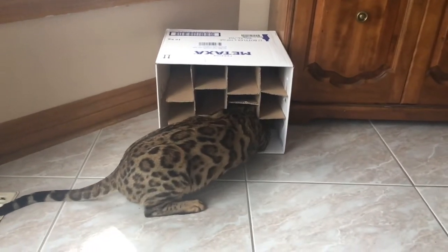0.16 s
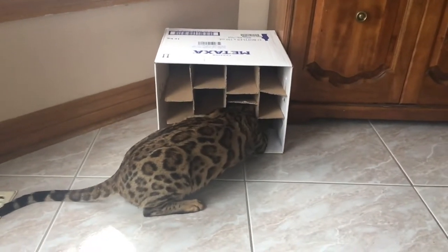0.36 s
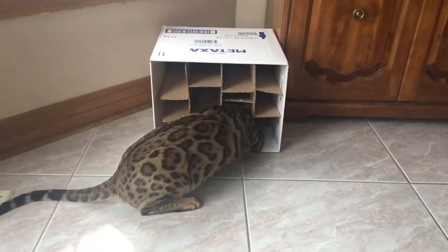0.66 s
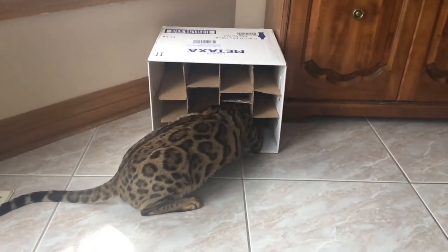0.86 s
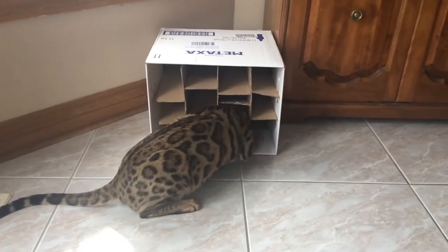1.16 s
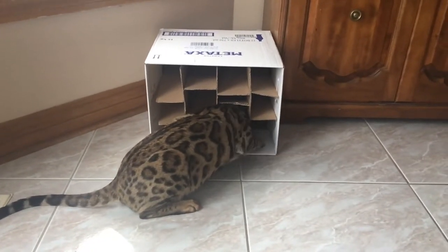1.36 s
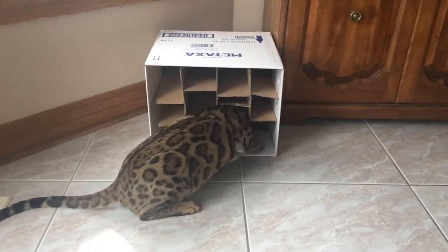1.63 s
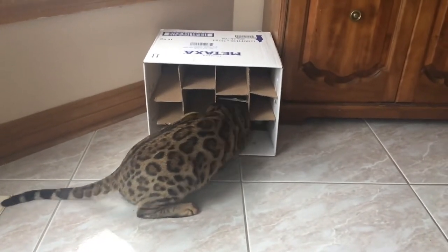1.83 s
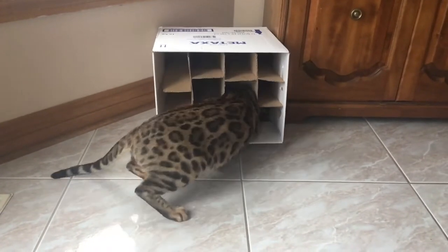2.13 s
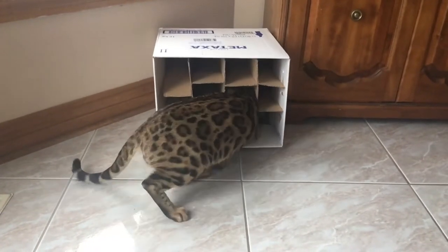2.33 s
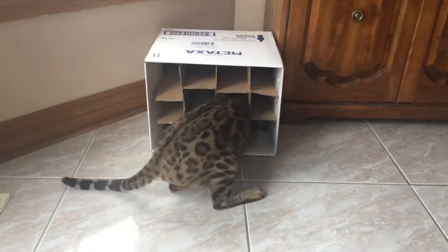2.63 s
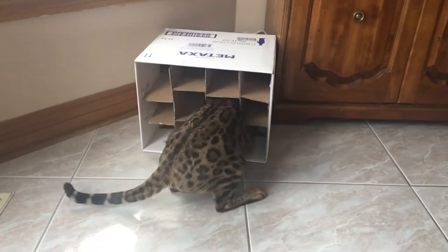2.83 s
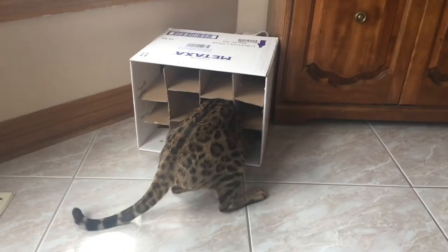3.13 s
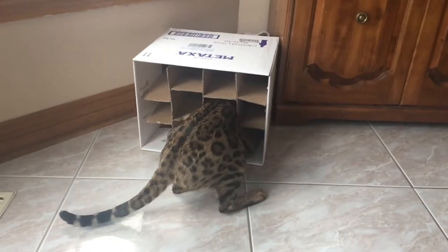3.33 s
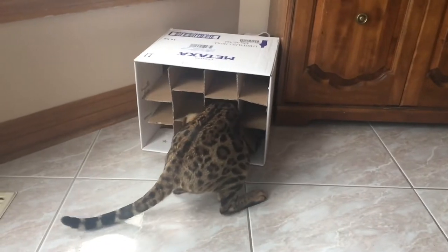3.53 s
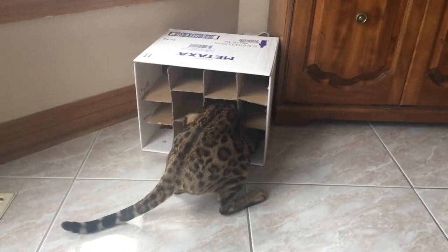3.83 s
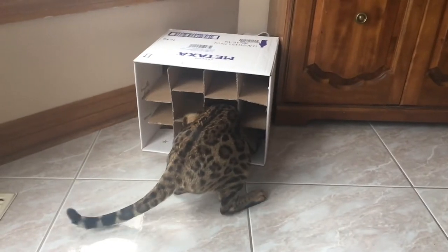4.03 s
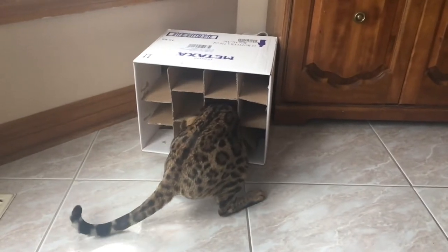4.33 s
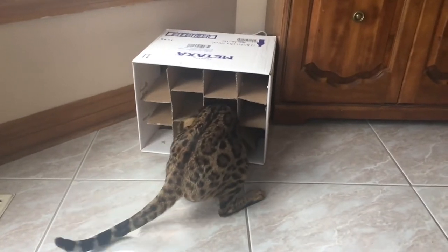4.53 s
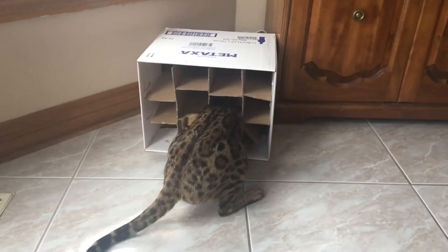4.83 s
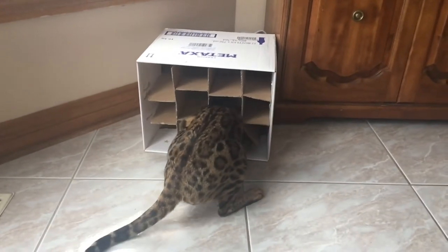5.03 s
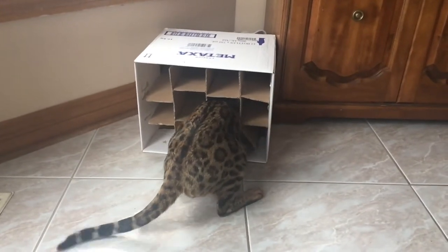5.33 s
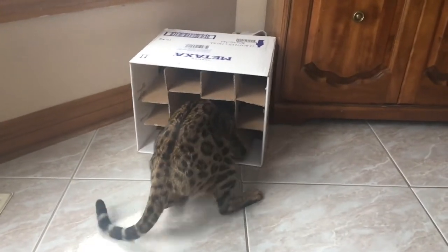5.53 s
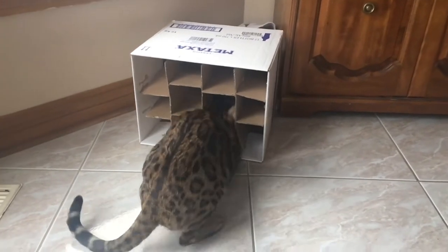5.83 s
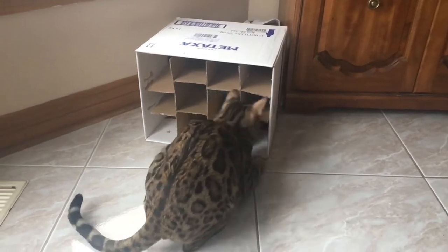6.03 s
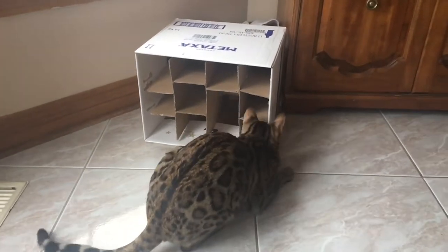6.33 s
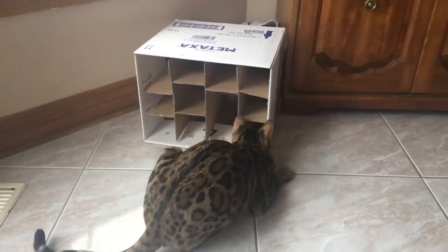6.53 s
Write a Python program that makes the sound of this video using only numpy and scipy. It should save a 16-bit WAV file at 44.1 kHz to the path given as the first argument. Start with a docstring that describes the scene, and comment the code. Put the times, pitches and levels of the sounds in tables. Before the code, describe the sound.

Cardboard rustles, scrapes and knocks as a cat pushes into a box, one heavy hollow thump midway, then scattered flicks and fading rubs.

```python
"""A cat pushes its head and paws into a cardboard carton with dividers, on the tiles of a quiet room.
Over a low steady background and a faint hiss, small flicks, thumps and rubs come first. After two seconds
it gets busy: claws rake, divider edges flick free, and the loudest wall thump follows just before three.
Rubbing then comes and goes, with fur hissing and paws dragging as many tiny slips, more flicks and soft
thumps (short swinging tones) among it; the last rubs die away into the quiet room."""
import sys
import numpy as np
from scipy import signal
from scipy.fft import rfft, irfft
from scipy.io import wavfile

SR = 44100
rng = np.random.default_rng(int(sys.argv[2]) if len(sys.argv) > 2 else 0)


def unload_wav(signal):
    """Save mono or channel-first audio to the path in sys.argv[1] as 16-bit WAV at rate SR, clipped to [-1, 1]."""
    wavfile.write(
        sys.argv[1],
        SR,
        np.round(np.clip(np.atleast_2d(signal).T, -1, 1) * 32767).astype(np.int16),
    )


N = 294147   # length in samples
CUTOFF_HZ = 15750   # top of the sound


def from_db(db):
    """Turn decibels into gain."""
    return 10 ** (np.asarray(db) / 20)


def rms_one(x):
    """Scale a sound to rms 1."""
    return x / np.sqrt(np.mean(x ** 2) + 1e-20)


def burst_one(x):
    """Scale a burst to the energy of 10 ms at rms 1."""
    return x / np.sqrt(np.sum(x ** 2) / (.01 * SR) + 1e-20)


def at_hz(points, hz):
    """Read a table between its points, along a log-frequency axis."""
    knots, values = np.transpose(points)
    return np.interp(np.log(np.maximum(hz, 1)), np.log(knots), values)


def add(track, s, sound):
    """Mix a sound into a track from time s (seconds) on."""
    start = max(round(s * SR), 0)
    track[start:start + len(sound)] += sound[:N - start]


def drift(rate):
    """Smooth random wandering of rms 1, with a new target rate times a second."""
    targets = rng.standard_normal(N)
    return rms_one(np.interp(np.arange(N) / SR * rate, np.arange(N), targets))


def colour(x, spectrum, size=8192):
    """Filter to the given spectrum, reacting as early as possible (minimum phase), weak below hearing."""
    hz = np.arange(size // 2 + 1) * SR / size
    bass_cut = (hz ** 2 + 1) / (hz ** 2 + 20 ** 2)
    gain = from_db(at_hz(spectrum, hz)) * bass_cut
    # folding the cepstrum forward in time makes the filter minimum-phase
    cepstrum = irfft(np.log(gain))
    cepstrum[1:size // 2] *= 2
    cepstrum[size // 2 + 1:] = 0
    response = irfft(np.exp(rfft(cepstrum)))
    return signal.fftconvolve(x, response)[:len(x)]


def resonate(x, modes):
    """Resonances side by side, each (f/Hz, width/Hz, level/dB), added with alternating signs."""
    out = 0
    for k, (hz, width, db) in enumerate(modes):
        r = np.exp(-np.pi * width / SR)   # a wider resonance dies sooner
        poles = [1, -2 * r * np.cos(2 * np.pi * hz / SR), r * r]
        gain = (-1) ** k * from_db(db) * (1 - r * r) / 2
        out = out + gain * signal.lfilter([1, 0, -1], poles, x + 1e-18)
    return out


def slips(per_s, spread_db, size):
    """Surfaces stick and slip: tiny clicks at random times, of uneven strength and either sign."""
    strength = from_db(spread_db * np.minimum(rng.exponential(1, size), 4))
    happens = rng.random(size) < per_s / SR
    return strength * rng.choice([-1, 1], size) * happens


# colour of the low steady background: f/Hz, level/dB (relative)
QUIET_COLOUR = [(13, -25), (22, 0.5), (61, 0.5), (100, -11), (125, -21.5), (194, -1), (263, -12),
                (319, -5.5), (469, -13), (510, -16.5), (792, -28.5), (861, -39.5), (1380, -22), (2140, -37),
                (16000, -59.5)]


def quiet_room():
    """The low steady background is noise with most of its strength in the bass."""
    return from_db(-55.5) * rms_one(colour(rng.standard_normal(N), QUIET_COLOUR))


# colour of the faint hiss: f/Hz, level/dB (relative)
HISS_COLOUR = [(80, 9.5), (450, 1.5), (850, 0), (1400, -5.5), (2200, -11), (4000, -24), (8000, -24.5),
               (16000, -28)]


def steady_hiss():
    """The faint hiss is steady noise that weakens toward the treble."""
    return from_db(-63) * rms_one(colour(rng.standard_normal(N), HISS_COLOUR))


# how long the room's echo takes to fall by 60 dB: f/Hz, t/s
ROOM_DECAY = [(130, 0.51), (280, 0.59), (800, 0.58), (2200, 0.46), (5000, 0.5), (9000, 0.26), (15000, 0.18)]


def echo(x, wet_db, size=32768):
    """Tiles and walls return a dense echo: noise in bands, dying soonest in the high treble."""
    t, tail = np.arange(size) / SR, 0
    hz = np.arange(size // 2 + 1) * SR / size
    white = rfft(rng.standard_normal(size))
    centres = [f for f, t60 in ROOM_DECAY]
    for share, (centre, t60) in zip(np.eye(len(centres)), ROOM_DECAY):
        # each band is full at its own centre and fades to nothing at its neighbours'
        band = irfft(white * at_hz(list(zip(centres, share)), hz))
        tail = tail + band * from_db(-60 * t / t60)
    tail = tail * np.clip(t / 0.0043, 0, 1) ** 2   # the echo builds up over 4.3 ms
    tail = tail / np.sqrt(np.sum(tail ** 2))
    return from_db(wet_db) * signal.fftconvolve(x, tail)[:N]


def bulge(t, hz, swell_s):
    """A panel swings out and back for a cycle or two around t = 0."""
    return np.sin(2 * np.pi * hz * t) / np.cosh(t / swell_s)


REBOUND_S, REBOUND_PITCH = 0.02693, 1.166   # time between swings; pitch factor from one to the next
ROCK_HZ, ROCK_LAG_S, ROCK_SWELL_S, ROCK_DB = 95, 0.0213, .02, -22.5   # dB relative to the thump
SHUDDER_DB, SHUDDER_S = -18, 0.025   # dB relative to the thump; decay time constant
SHUDDER_LOW_HZ, SHUDDER_HIGH_HZ = 32, 238
# the carton's cavity and walls: f/Hz, width f/Hz, level/dB
CARTON_MODES = [(61, 20, 7), (100, 5, -2), (159, 24, 1.5), (183.7, 42, 1.5), (235, 10, 2), (298, 45, -7),
                (350, 20, 14)]
# pushes on the walls and paw falls, some followed by further swings of the same thump:
# middle t/s, level/dB, pitch f/Hz, swell and decay time constant t/s, loss per rebound level/dB
THUMPS = [(0.119, -29.5, 73.5, 0.0039, 16), (0.104, -38.5, 278, 0.0056, 5.5),
          (.884, -32.5, 236, 0.0023, 9.5), (1.096, -30.5, 242, 0.0016, 8.5), (2.021, -23.5, 190, 0.0034, 2),
          (2.046, -28, 142, 0.0076, 14), (2.076, -25, 163, 0.009, 13), (2.063, -31, 86, 0.007, 22),
          (2.847, -10, 164.5, 0.0034, 20), (2.915, -30.5, 204, 0.0071, 11), (3.141, -35, 85, 0.0026, 18),
          (3.368, -29.5, 195, 0.0022, 11), (3.383, -24, 95, 0.0031, 8), (3.49, -44, 93, 0.0062, 16),
          (4.08, -39.5, 219, 0.0031, 8), (4.175, -37.5, 250, .007, 10.5), (4.639, -33, 235, 0.0032, 7.5),
          (4.7569, -23, 128, 0.0027, 35), (5.462, -35, 70, 0.0026, 23), (5.467, -37, 285, 0.0064, 7)]


def thumps(count=3):
    """A wall bulges and rebounds ever more weakly; the carton rocks, shudders and booms with it."""
    out, t = np.zeros(N), np.arange(-SR // 10, SR // 5) / SR
    bass = signal.butter(4, [SHUDDER_LOW_HZ, SHUDDER_HIGH_HZ], "band", fs=SR, output="sos")
    for s, db, hz, swell_s, loss_db in THUMPS:
        wall = 0
        for k in range(count):
            swing = bulge(t - k * REBOUND_S, hz * REBOUND_PITCH ** k, swell_s)
            wall = wall + from_db(-loss_db * k) * swing
        rock = from_db(ROCK_DB) * bulge(t - ROCK_LAG_S, ROCK_HZ, ROCK_SWELL_S)
        rumble = rms_one(signal.sosfilt(bass, rng.standard_normal(len(t))))
        shudder = rumble * np.clip(t / swell_s, 0, 1) * np.exp(-t / SHUDDER_S)
        add(out, s + t[0], from_db(db) * (wall + rock + from_db(SHUDDER_DB) * shudder))
    return out + from_db(-16) * resonate(out, CARTON_MODES)


# strokes that set one panel or cell singing hoarsely:
# middle t/s, length t/s, level/dB, f/Hz, width f/Hz
STROKES = [(0.105, 0.073, -49.5, 470, 298), (2.049, 0.056, -37, 920, 240), (2.255, 0.085, -47, 1320, 200),
           (2.424, 0.091, -47, 1730, 88.4), (2.483, 0.24, -45, 2110, 170), (2.488, 0.22, -49, 1110, 250),
           (2.819, .3, -51.5, 810, 260), (3.083, 0.42, -53.5, 820, 254), (4.166, 0.17, -57, 953, 298)]


def strokes():
    """A stroke swells and fades while its tiny slips feed one resonance."""
    out = np.zeros(N)
    for s, length_s, db, hz, width_hz in STROKES:
        swell = signal.windows.hann(round(length_s * SR))
        tone = rms_one(resonate(slips(1500, 0.9, len(swell)), [(hz, width_hz, 0)]))
        add(out, s - length_s / 2, from_db(db) * swell * tone)
    return out


RATTLE_HZ, RATTLE_WIDTH_HZ, RATTLE_DB = 3420, 1740, -10   # dB relative to the divider ring
RING_BODY = 0.16   # share of broad rasp in the ring of a flicked edge
# pitch of the crack at this chatter time; longer chatter lowers it by this power
CRACK_HZ, CRACK_CHATTER_S, CRACK_FALL = 8870, 0.003, 0.82
# colour of the card: f/Hz, level/dB (relative)
CARD_COLOUR = [(80, 3.5), (250, 2.5), (450, 6.5), (850, 11.5), (1400, 8), (2500, 3.5), (3500, -8),
               (5000, -11.5), (8000, -14), (13000, -26), (16000, -40)]
# colour of the rasp on the dividers: f/Hz, level/dB (relative)
RASP_COLOUR = [(700, -5.5), (1400, 0), (2200, 3), (3300, -1), (4800, -14.5), (8000, -20), (16000, -75)]
# air and panel resonances of the narrow cells: f/Hz, width f/Hz, level/dB
CELL_MODES = [(286, 38, 9.5), (555, 24, 8), (584, 130, -4), (820, 18, 2.5), (940, 66, -8.5),
              (1215, 160, -5.5), (1260, 98, -28)]
# bending resonances of the dividers: f/Hz, width f/Hz, level/dB
DIVIDER_MODES = [(1620, 150, 0.5), (2020, 59, 7.5), (2110, 75, 2.5), (2395, 127, 7.5), (2720, 150, -30),
                 (3420, 620, -9.5)]
# divider edges flicking free: t/s, level/dB, chatter time constant t/s,
# then wall thud, edge ring and crack, each level/dB relative to the flick
FLICKS = [(0.0458, -42.5, 0.0033, -9, 2.5, -4), (.093, -47.5, 0.01, 9.5, -17, -30),
          (.869, -54, 0.0033, 2, 2.5, -14.5), (1.0766, -38, 0.0031, -4, -2.5, -5),
          (1.216, -54, .0035, -15, 5, -30), (1.33, -69.5, 0.0018, 8, 4.5, -11),
          (1.458, -72, 0.0043, -20, -20, 5), (1.836, -60, 0.0054, -2, 5, -7),
          (2.025, -38, 0.0075, -3, -1, -5.5), (2.039, -35, 0.0051, 7, -17, -24),
          (2.134, -39, 0.011, -2, -2, -2.5), (2.254, -56, 0.0075, -15, 9, -14),
          (2.834, -57.5, 0.0058, 22, -12, 1), (3.355, -39.5, 0.0088, 0.5, -10, -28),
          (3.4638, -44, 0.013, 1.5, 3.5, 4.5), (4.473, -49, 0.0025, -22, -5, -32),
          (4.5141, -31.5, 0.012, -39, -1.5, -11), (4.721, -49, 0.0069, -5, -8, -14),
          (5.19, -46, 0.005, 4, 5, -15), (5.1952, -34.5, 0.0067, -2, 10, -1.5),
          (5.437, -36, 0.0069, -5.5, 9.5, -6.5), (5.639, -53, 0.0069, -4, -6, -8),
          (5.704, -49, 0.019, 0.5, -2.5, -16), (5.756, -52.5, 0.0084, -26, 0, -18)]


def flicks(size=8192):
    """An edge lets go with a click, then chatters against its neighbours; heard from one direction."""
    out, t = np.zeros(N), np.arange(size) / SR
    for s, db, chatter_s, thud_db, ring_db, crack_db in FLICKS:
        chatter = burst_one(slips(4500, 0.5, size) * np.exp(-t / chatter_s))
        release = burst_one(1.0 * (t == 0))
        force = chatter + .5 * release
        cells = burst_one(resonate(force, CELL_MODES))
        card = burst_one(burst_one(colour(force, CARD_COLOUR)) + 0.14 * cells)
        thud = from_db(thud_db) * burst_one(resonate(force, [(250, 29.5, 0)]))
        rasp = burst_one(colour(force, RASP_COLOUR))
        rattle = from_db(RATTLE_DB) * burst_one(resonate(rasp, [(RATTLE_HZ, RATTLE_WIDTH_HZ, 0)]))
        bending = burst_one(resonate(rasp, DIVIDER_MODES))
        ring = from_db(ring_db) * burst_one(bending + rattle + RING_BODY * rasp)
        # the cut edge crackles as it slides off
        fibres = slips(16000, 0.47, size) * np.exp(-t / (0.82 * chatter_s))
        crack_hz = min(CRACK_HZ * (CRACK_CHATTER_S / chatter_s) ** CRACK_FALL, CUTOFF_HZ)
        edge = [(crack_hz, 1.0 * crack_hz, 0)]   # as wide as its pitch
        crack = from_db(crack_db) * burst_one(resonate(resonate(fibres, edge), edge))
        add(out, s, from_db(db) * (card + thud + ring + crack))
    return out


def rub_envelope(start_s, attack_s, length_s, release_s):
    """The contact swells, holds and lets go; the letting go starts length_s after the start."""
    t = np.maximum(np.arange(N) / SR - start_s, 0)
    swell = np.sin(np.pi / 2 * np.minimum(t / attack_s, 1)) ** 2
    return swell * np.exp(-np.clip((t - length_s) / release_s, 0, 20))


SLIDE_RELEASE_S, SCRATCH_RELEASE_S = 0.038, 0.016   # time constants of letting go
RASP_SHARE_DB = -7   # every slide also rasps the dividers, relative to its drag
PRESSURE_DB, PRESSURE_PER_S = 2.7, 22   # the cat bears down unevenly
SNAGS_PER_S, SNAG_SPREAD_DB, SNAG_DB = 82, 3, -16.5   # torn fibres catch; dB relative to the drag
# colour of the drag: f/Hz, level/dB (relative)
DRAG_COLOUR = [(40, 4), (80, 3.5), (130, 3.5), (260, -0.5), (450, -10), (650, -4), (850, -2), (1300, -6),
               (1900, -7), (4000, -44.5), (16000, -40)]
# colour of the fur: f/Hz, level/dB (relative)
FUR_COLOUR = [(1500, -25), (4000, -6.5), (6500, 1), (8000, -3), (10000, -1.5), (12000, 0), (14000, -8),
              (16000, 0.5)]
# the cat slides its head, flank or a leg along the card:
# start t/s, attack t/s, length t/s, drag level/dB, fur hiss level/dB
SLIDES = [(0.0, 0.0019, 0.018, -45.5, -61), (0.068, 0.026, 0.015, -40, -80), (0.262, 0.19, .22, -64, -72.5),
          (0.723, 0.098, .16, -67.5, -71.5), (0.997, 0.11, .15, -57, -66), (1.786, 0.089, 0.13, -49, -55.5),
          (1.895, 0.034, 0.088, -50, -57.5), (2.004, 0.028, 0.07, -37.5, -49),
          (2.061, 0.032, 0.05, -37, -47.5), (2.128, .02, 0.26, -56, -67.5), (2.356, 0.18, 0.29, -50.5, -57),
          (2.56, .03, 0.33, -53.5, -59.5), (2.728, 0.12, 0.2, -52.5, -60), (2.952, 0.038, 0.11, -53, -58),
          (3.111, 0.031, 0.021, -46.5, -54.5), (3.188, 0.038, 0.045, -51.5, -56.5),
          (3.298, 0.065, 0.085, -46.5, -51.5), (3.42, 0.027, 0.064, -52, -66), (3.67, .03, 0.029, -63, -66),
          (4.045, 0.037, 0.11, -57.5, -66), (4.109, 0.046, 0.076, -49, -62),
          (4.251, 0.24, .38, -56.5, -67.5), (4.67, 0.046, 0.088, -54.5, -57.5),
          (4.97, 0.06, 0.33, -63.5, -70.5), (5.25, 0.034, 0.27, -62, -78), (5.452, 0.029, 0.15, -53.5, -63),
          (5.6, 0.043, .05, -55.5, -59.5), (5.666, 0.038, 0.034, -55.5, -55), (5.74, .02, 0.02, -55, -56.5),
          (5.798, 0.032, 0.049, -57, -61), (5.866, 0.023, 0.11, -64, -66)]
# claws rake a divider: start t/s, attack t/s, length t/s, level/dB
SCRATCHES = [(0.0, 0.0017, 0.059, -50.5), (2.015, .015, .025, -49), (2.113, 0.021, .02, -31.5),
             (2.194, .05, 0.09, -54.5), (2.376, 0.084, 0.17, -46.5), (2.543, 0.019, 0.24, -52.5),
             (3.48, .04, 0.095, -63.5), (4.546, 0.045, 0.051, -66), (4.732, 0.023, 0.04, -54.5),
             (5.002, .03, 0.37, -66)]


def rubbing():
    """Dense slips: pads shake whole cells, claws ring the dividers, fur makes the finest grain."""
    # where contacts overlap, the strongest one counts
    drag_gain = fur_gain = 0
    for s, attack_s, length_s, drag_db, fur_db in SLIDES:
        contact = rub_envelope(s, attack_s, length_s, SLIDE_RELEASE_S)
        drag_gain = np.maximum(drag_gain, from_db(drag_db) * contact)
        fur_gain = np.maximum(fur_gain, from_db(fur_db) * contact)
    rasp_gain = from_db(RASP_SHARE_DB) * drag_gain
    for s, attack_s, length_s, db in SCRATCHES:
        contact = rub_envelope(s, attack_s, length_s, SCRATCH_RELEASE_S)
        rasp_gain = np.maximum(rasp_gain, from_db(db) * contact)

    grip = drift(130)   # the contact tightens and loosens
    pads = rms_one(colour(slips(2000, 3.4, N), DRAG_COLOUR))
    cells = rms_one(resonate(slips(1200, 4.5, N), CELL_MODES))
    drag = rms_one(pads + 0.78 * cells) * drag_gain * from_db(1.54 * grip)

    claws = rms_one(colour(slips(3500, 0.55, N), RASP_COLOUR))
    dividers = rms_one(resonate(slips(1500, 2.2, N), DIVIDER_MODES))
    rasp = rms_one(claws + 0.75 * dividers) * rasp_gain * from_db(1.8 * grip)

    fur = rms_one(colour(slips(9000, 1.7, N), FUR_COLOUR)) * fur_gain * from_db(1.47 * grip)
    catches = rms_one(colour(slips(SNAGS_PER_S, SNAG_SPREAD_DB, N), CARD_COLOUR))
    snags = catches * drag_gain * from_db(SNAG_DB)
    pressure = from_db(PRESSURE_DB * drift(PRESSURE_PER_S))
    return (drag + rasp + fur + snags) * pressure


def scene(count=3):
    """The cat and carton in their room, over a low steady background and a faint hiss."""
    background = quiet_room() + steady_hiss()
    thump = thumps()
    rub = rubbing() + strokes()
    # a flick radiates differently each way, and each way returns its own echo
    flick = flicks() + sum(echo(flicks(), wet_db=-12.0) for way in range(count))
    thump_in_room = thump + echo(thump, wet_db=-12)
    rub_in_room = rub + echo(rub, wet_db=-8)
    return (background + thump_in_room + flick + rub_in_room)[None]


def record(dry):
    """The microphone loses the deepest bass; the top is cut steeply."""
    bass_cut = signal.butter(4, 30, "high", fs=SR, output="sos")
    top_cut = signal.ellip(10, .2, 80, CUTOFF_HZ, fs=SR, output="sos")
    return signal.sosfilt(top_cut, signal.sosfilt(bass_cut, dry))


dry = scene()
out = record(dry)
unload_wav(out)
```